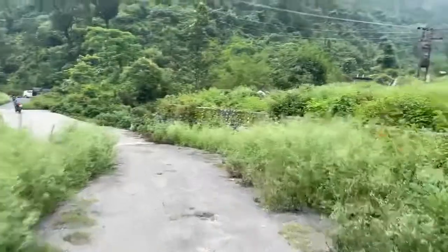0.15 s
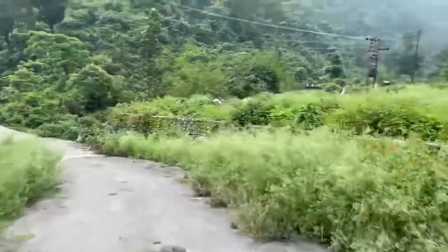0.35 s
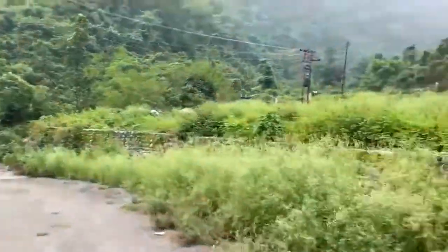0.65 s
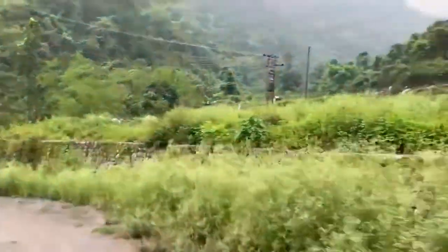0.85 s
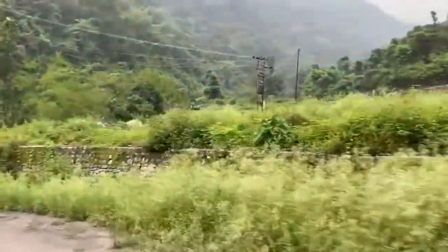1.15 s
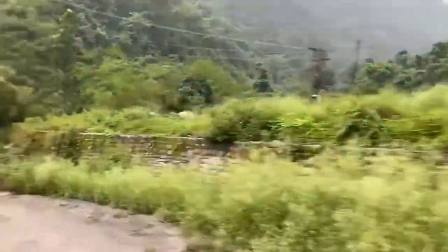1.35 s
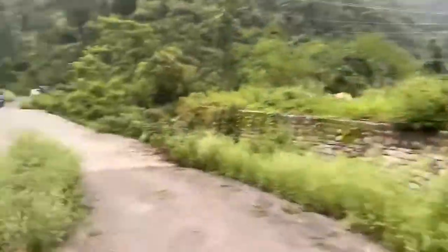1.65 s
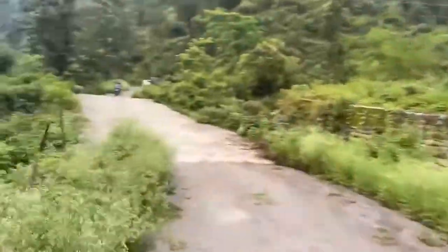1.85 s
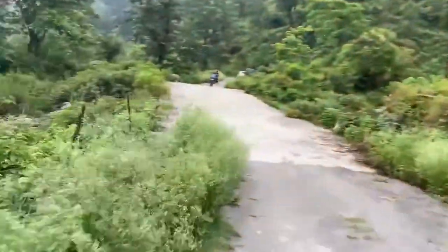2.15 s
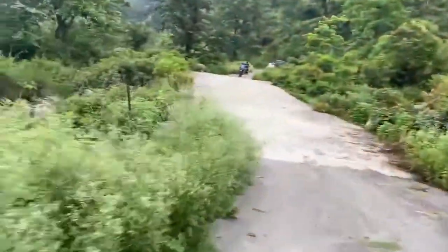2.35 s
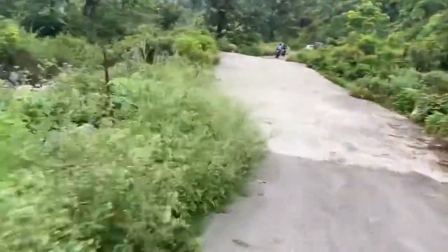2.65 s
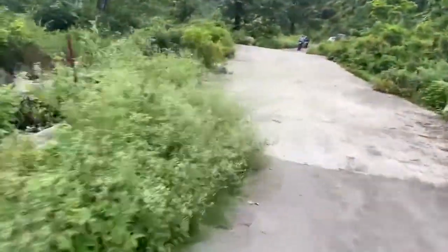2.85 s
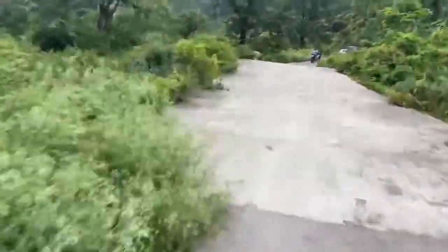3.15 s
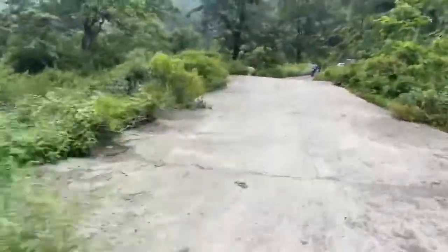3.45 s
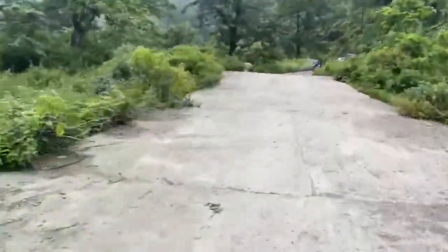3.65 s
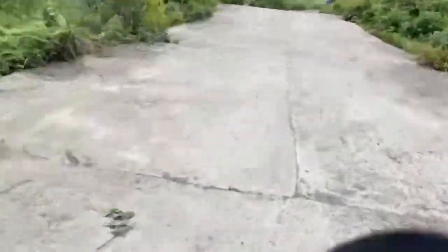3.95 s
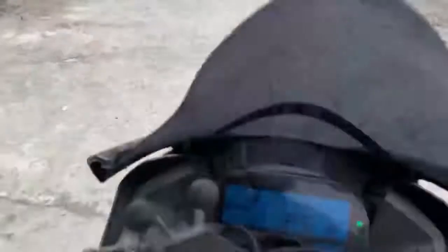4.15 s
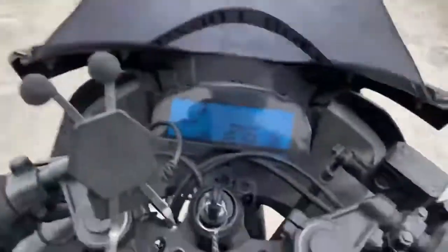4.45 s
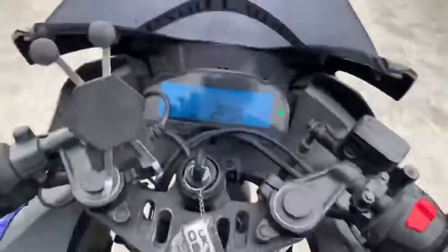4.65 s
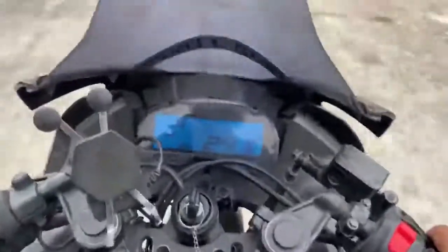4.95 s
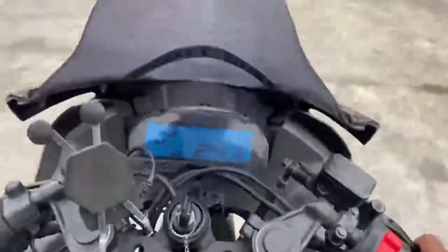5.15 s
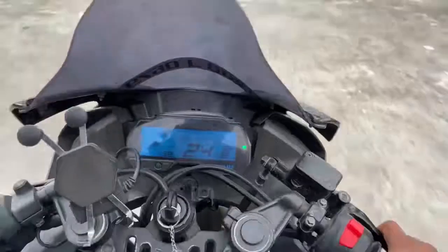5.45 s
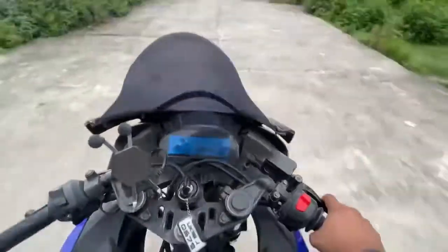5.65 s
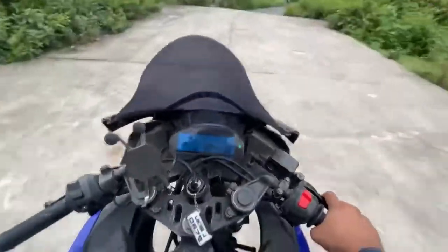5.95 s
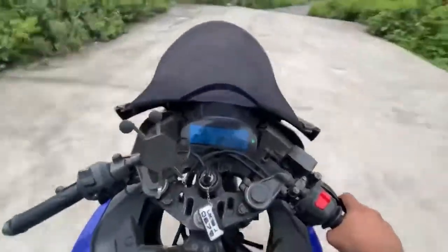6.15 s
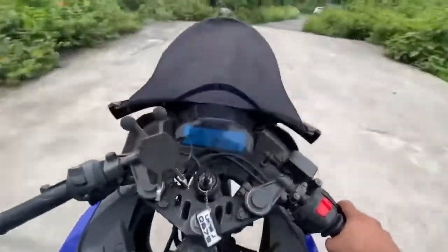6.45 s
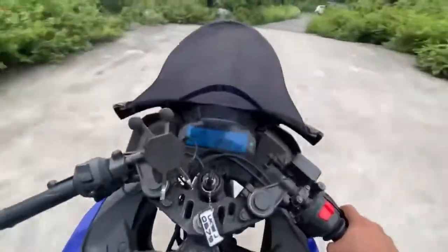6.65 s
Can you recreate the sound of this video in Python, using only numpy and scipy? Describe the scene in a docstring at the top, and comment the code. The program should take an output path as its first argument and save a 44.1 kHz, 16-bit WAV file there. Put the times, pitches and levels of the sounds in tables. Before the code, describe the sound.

Wind rumbles and thumps on a microphone carried on a small motorcycle along a rough track. Beneath it, throughout, a single-cylinder engine chugs at low, nearly even revs, with light valve clatter and a steady tyre roar. Strong gusts come in the first second. From about 0.3 to 1.2 seconds a brake gives a thin, high, stuttering squeal, loudest near 0.7. Faint crickets trill in short bursts until 2 seconds and again around 3.3. The wind eases between about 1.6 and 4 seconds, with a few softer swells. Then the roar grows slightly and the hardest buffets land around 4.3 to 4.5 seconds, along with a very brief whine from the bike. The engine's clatter becomes a little more ringing, and dull blows of air keep coming. From about 5.6 seconds the wind sounds wider and leans right as the bike runs on until nearly 7 seconds.

```python
"""Wind rumbles and thumps on the two microphone ports of a camera riding a small motorcycle down a rough
track through scrub. Under it the single cylinder turns at low revs: each firing rings the exhaust pipe,
the valve gear clatters and the tyres roar. Early on a brake disc squeals by stick-slip and crickets trill
faintly. Late on the camera tips down to the tank, the bike whines briefly, and the camera turns so that
the wind meets one port first."""
import sys
import numpy as np
from scipy import signal
from scipy.fft import next_fast_len
from scipy.io import wavfile
from scipy.ndimage import uniform_filter1d, minimum_filter1d

SR = 44100
rng = np.random.default_rng(int(sys.argv[2]) if len(sys.argv) > 2 else 0)


def dump(signal):
    """Clip the signal to [-1, 1] and save it as 16-bit WAV at the path in sys.argv[1]."""
    limited = np.clip(np.atleast_2d(signal).T, -1, 1)
    pcm = np.round(limited * 32767).astype(np.int16)
    wavfile.write(sys.argv[1], SR, pcm)


N = 299439

# wind bed: (time [s], rumble [dB], deep layer against the rumble [dB], flutter [dB])
WIND_LEVELS = [(0, -13.5, -27, -30), (.26, -20, -3, -29.5), (.38, -14.5, -2.5, -28),
               (.76, -15.5, -3.5, -23.5), (.84, -27, -5.5, -23), (1.44, -19.5, -4.5, -23),
               (1.6, -31.5, -6.5, -32.5), (2.05, -34.5, 1, -42), (2.3, -20.5, -18, -34),
               (2.52, -16.5, -18, -29.5), (2.7, -28, -4, -28.5), (3.0, -28.5, -8, -33.5),
               (3.15, -20.5, -16, -29.5), (3.28, -26.5, -9, -27.5), (3.42, -20, -17, -28),
               (3.6, -30, 2, -32.5), (3.9, -24.5, -12, -29.5), (4.1, -16.5, -5, -28), (4.3, -17.5, -7, -24),
               (4.39, -20, -7, -23), (4.49, -16, -6, -20.5), (4.54, -23, -5, -27.5), (4.6, -20, -0.5, -28),
               (4.73, -28.5, -4, -27.5), (5.1, -26.5, -6, -29.5), (5.55, -30.5, -5, -30.5),
               (5.65, -20, -8, -22), (5.8, -27, -5, -34), (6.03, -25.5, -2, -21.5), (6.2, -22, -5, -28),
               (6.79, -27, -6, -29)]
# single blows of air: (time [s], relative level [dB], crack accent [dB], crack pitch [Hz])
AIR_BLOWS = [(0.317, -7.5, -25, 498), (0.356, -11, -25, 450), (0.391, -4.5, -9, 510),
             (0.425, -14, -12, 500), (0.456, -11, -26, 450), (0.48, -29, -25, 750), (0.518, -10, -21, 485),
             (0.543, -11, -11, 434), (0.587, -7, -24, 514), (0.626, -11, -20, 398), (0.684, -4.5, -29, 774),
             (0.76, -0.5, -18, 482), (0.887, -5.5, -19, 570), (0.929, -11, -1.5, 467),
             (0.981, -11.5, -3.5, 517), (1.092, -8.5, -1, 630), (1.143, -26, 5, 647),
             (1.396, -17.5, 0, 784), (2.046, -18.5, -5, 925), (3.451, -13, -19, 560),
             (3.964, -11.5, -19, 727), (4.273, -5.5, -29, 549), (4.326, 1.5, -12, 486),
             (4.358, -1, 1.5, 530), (4.384, -12, -12, 400), (4.4, -12, -10, 400), (4.422, 3, -2, 510),
             (4.458, 1, -10, 550), (4.47, 1, -17, 450), (4.503, -4.5, -2.5, 475), (4.572, -10.5, -10, 454),
             (4.771, -6.5, -16, 471), (4.788, -3.5, -17, 770), (4.89, -3.5, -24, 506),
             (4.918, -1.5, -3.5, 650), (4.97, -1, -9, 557), (5.019, -11, -3.5, 490), (5.056, -11, -16, 420),
             (5.088, -2, -7.5, 550), (5.134, -19, -15, 420), (5.248, -7, -17, 464), (5.325, -6, -13, 540),
             (5.341, -21, -19, 500), (5.46, -4, -3, 620), (5.487, -10.5, -9, 780), (5.648, -21, 2.5, 490),
             (5.744, -14, -29, 759), (5.898, -8.5, -6, 710), (5.97, -11, -21, 1130),
             (6.051, -16.5, 2, 1150), (6.079, -13.5, -12, 776), (6.137, -22, 3, 576),
             (6.531, -15.5, -9.5, 482), (6.749, -17.5, -10, 870)]
# camera pose: (time [s], tipped to the tank [0-1], turned [0-1], wind's lead at the left port [rad])
CAMERA_POSE = [(0, 0.83, 0, 0.41), (1.5, 0.43, 0, 0.93), (3.6, 0.1, 0, 0.98), (4.3, 1, 0, -0.73),
               (5.5, 1, 0, -0.82), (5.7, 1, 0.9, -0.06), (6.2, 0.96, 1, 0.063), (6.79, 1, 1, 0.084)]
# engine speed: (time [s], firing rate [Hz])
FIRING_RATE = [(0, 20.854), (.45, 22.289), (1.05, 19.664), (1.9, 20.34), (2.4, 21.51), (3.3, 22.527),
               (3.95, 24.148), (4.6, 22.752), (5.6, 22.681), (6.45, 21.677), (6.79, 22.016)]
# exhaust pipe resonances: (pitch [Hz], width [Hz], relative level [dB])
PIPE_MODES = [(70, 34, 19), (110, 42.4, 27.5), (159, 120, 11)]
# valve gear and casing rings: (place in the cycle [0-1], pitch [Hz], width [Hz], decay [ms],
# steady rattle [0-1], level [dB], gain when tipped [dB], left-right likeness [0-1])
CLATTER_MODES = [(.93, 4700, 420, 6, .1, -51, -5.5, .5), (.65, 4900, 700, 8, .3, -56, 0, .5),
                 (.96, 3780, 300, 6, .12, -52.5, -5.5, .4), (.95, 3370, 130, 6, .15, -53.5, -2.5, .2),
                 (.62, 3250, 220, 8, .6, -56, 3, .4), (.7, 2500, 1600, 5, .05, -52, -1, .4),
                 (.4, 752, 33, 10, .6, -46.5, 8.5, .8), (.6, 955, 90, 8, .5, -46, 3, .7),
                 (.65, 1110, 120, 6, .4, -46, 4.5, .7), (.65, 1440, 60, 6, .3, -54, 5, .7),
                 (.68, 1615, 60, 6, .3, -48.5, 2.5, .8), (.68, 1750, 36, 7, 1, -59, 12, .7),
                 (.68, 1870, 70, 6, .5, -53, 4.5, .6), (.68, 2080, 60, 6, .3, -54, 2, .4),
                 (.68, 2190, 60, 6, .5, -56.5, 3, .5), (.68, 2350, 80, 6, .3, -53.5, -3, .4),
                 (.68, 2280, 50, 6, .7, -66, 16, .4), (.68, 2510, 90, 6, .3, -53.5, 0, .3),
                 (.68, 2590, 55, 5, .6, -64, 13, .4), (.68, 2910, 130, 6, .5, -59, 7.5, .3),
                 (.68, 2715, 50, 5, .2, -54, -7, .2), (.95, 4090, 70, 6, .4, -60, 1, .5),
                 (.67, 5700, 800, 6, .3, -60, 2, .1)]
# the bike's brief whine: (pitch [Hz], width [Hz], level [dB])
WHINE_MODES = [(2290, 40, -40), (1660, 45, -41)]
# tyre and engine roar: (time [s], relative level [dB], relative treble [dB])
ROAR_LEVELS = [(0, -34, -22), (.25, -38, -14.5), (1.25, -35.5, -19.5), (3.69, -35, -16),
               (4.12, -31.5, -16.5), (4.33, -33.5, -14.5), (5.35, -33, -15.5), (5.86, -34, -16.5),
               (6.79, -33, -17)]
# tone of the roar: (frequency [Hz], relative level [dB])
ROAR_SPECTRUM = [(150, 4), (400, -1.5), (900, 1.5), (1400, -2.5), (2050, -9), (3000, -14), (4300, -17.5),
                 (6500, -19.5), (7300, -26), (8800, -24.5), (11000, -25), (13000, -30), (15800, -25)]
# the roar's hiss is wide in some treble bands, centred in others:
# (frequency [Hz], left-right likeness [-1..1])
ROAR_LIKENESS = [(300, .7), (1500, .65), (2400, .1), (3800, .55), (5000, .3), (6300, -.2), (6900, -.6),
                 (7300, -.995), (8800, -.995), (9200, -.4), (10100, .3), (10500, .995), (12300, .995),
                 (12800, 0), (13500, -.5), (13900, -.995)]
# swell of the brake squeal: (time [s], level [dB])
SQUEAL_LEVELS = [(0.2, -67), (.33, -55), (.38, -39.5), (.41, -39), (0.46, -33), (.55, -40.5), (0.6, -41),
                 (0.676, -26.5), (0.74, -29), (.84, -33.5), (.89, -41), (.93, -43), (1.0, -46), (1.1, -43),
                 (1.2, -68)]
# squeal side tones: (pitch [ratio], relative level [dB], swell followed [ratio], right gain [ratio])
SQUEAL_PARTIALS = [(1.03, -8.5, .45, .8), (.97, -20, 1, .8), (.845, -19, 1.1, .3), (2, -20, 1, -.98)]
# cricket trills: (time [s], length [s], pitch [Hz], level [dB], right gain [ratio])
TRILLS = [(0.033, .06, 5800, -53, -.4), (0.118, .1, 5800, -47, -.4), (0.245, 0.055, 5900, -52, .8),
          (0.333, 0.11, 5800, -50, 0.87), (0.402, 0.15, 5600, -46, -.4), (0.558, 0.15, 5840, -49, -0.27),
          (.72, 0.11, 5850, -46, -.4), (0.848, .07, 5800, -49, .8), (0.974, 0.091, 5800, -47, -.2),
          (1.263, .12, 5900, -48, -.3), (1.566, .17, 5850, -64, -0.32), (1.87, 0.12, 5800, -49, -0.59),
          (3.202, 0.098, 6300, -47, -.2), (3.323, 0.11, 6100, -47, -0.36)]

TIME = np.arange(N) / SR
BIKE_PAN_DB_PER_S, BIKE_PAN_LIMIT_DB = -1.1, -2.8  # left minus right: the bike drifts to the right


def amp(db):
    """Decibels to gain."""
    return 10 ** (np.asarray(db) / 20)


def unit_rms(x):
    """Scales to rms 1."""
    return x / np.sqrt(np.mean(x ** 2) + 1e-20)


def curves(rows, t):
    """Every column of a table read at times t."""
    times, *columns = np.transpose(rows)
    return [np.interp(t, times, column) for column in columns]


def add(mix, start_s, sound):
    """Lays a stereo sound into the mix."""
    start = max(round(start_s * SR), 0)
    part = mix[:, start:start + sound.shape[1]]
    part += sound[:, :part.shape[1]]


def resonate(x, hz, width, stages=2):
    """Resonances in series, each of gain about 1 at hz."""
    r = np.exp(-np.pi * width / SR)
    c = r * np.cos(2 * np.pi * hz / SR)
    for _ in range(stages):
        x = signal.lfilter([2 * (1 - r), -2 * (1 - r) * c], [1, -2 * c, r ** 2], x)
    return x


def stereo(mid, side, likeness, pan_db):
    """Left and right share mid and differ by side."""
    angle = np.arccos(np.clip(likeness, -1, 1)) / 2
    shared, apart = np.cos(angle) * mid, np.sin(angle) * side
    return np.array([(shared + apart) * amp(pan_db / 2), (shared - apart) * amp(-pan_db / 2)])


def wander(per_s):
    """Smooth random drift of rms 1."""
    size = max(int(SR / 16 / per_s), 1)
    slow = rng.standard_normal(N // 16 + 2)
    for _ in range(2):
        slow = uniform_filter1d(slow, size, mode="wrap")
    return np.interp(np.arange(N) / 16, np.arange(len(slow)), unit_rms(slow))


def eddies(lo_hz, hi_hz, per_s, spread_db, cycles, tilt, lumps, bands):
    """Two unrelated streams of short pressure swirls of many sizes."""
    out = np.zeros((2, N))
    for hz in np.geomspace(lo_hz, hi_hz, bands):
        turns = np.arange(-2 * cycles, 2 * cycles, hz / SR)
        swirl = np.exp(-2 * (turns / cycles) ** 2) * np.sin(2 * np.pi * (turns + rng.random()))
        when = rng.integers(0, 2 * N, int(2 * N * per_s / bands / SR))
        strength = amp(spread_db * np.minimum(rng.exponential(1, len(when)), 4))
        kicks = np.zeros((2, N))
        kicks.flat[when] = strength * rng.choice([-1, 1], len(when))
        out += signal.oaconvolve(kicks * lumps, swirl[None] * (hz / lo_hz) ** tilt, "same", axes=1)
    return unit_rms(out)


def wind():
    """Swirls on the ports: a deep layer under rumble and flutter that share the same small gusts."""
    rumble_db, deep_db, flutter_db = curves(WIND_LEVELS, TIME)
    turned = curves(CAMERA_POSE, TIME)[1]
    likeness = .9 * (1 - turned) - .35 * turned
    pan_db = -.5 - 4.5 * turned + 2.2 * wander(12)
    coarse_t, lag_s, half_width_s = TIME[::44], .016, .016
    swells = sum(amp(db) * np.exp(-((coarse_t - s - lag_s) / half_width_s) ** 2)
                 for s, db, _, _ in AIR_BLOWS)  # each buffet briefly swells the bed
    swells = np.interp(TIME, coarse_t, swells)
    lumps = amp(1.7 * wander(68) + 1.37 * wander(19.6))
    deep = eddies(55.4, 58, per_s=120, spread_db=1, cycles=1.1, tilt=.12, lumps=1, bands=4)
    rumble = eddies(84.5, 169.7, per_s=300, spread_db=1.6, cycles=1.7, tilt=-.39, lumps=lumps, bands=7)
    flutter = eddies(241.5, 700, per_s=800, spread_db=2.1, cycles=1.18, tilt=-.69, lumps=lumps, bands=8)
    low = (amp(rumble_db) + amp(-17.5) * swells) * (rumble + amp(deep_db) * deep)
    high = (amp(flutter_db) + amp(-34.5) * swells) * flutter
    # small swirls differ more between the ports than large ones
    return stereo(*low, likeness, pan_db) + stereo(*high, likeness - .15, pan_db)


def buffets():
    """Each dull blow of air opens with a short crack, then slides raggedly down into the bass."""
    out = np.zeros((2, N))
    t = np.arange(4000) / SR
    age = t / .0291  # in lengths of a blow
    envelope = np.sin(np.pi / 2 * np.minimum(age / .17, 1)) ** 2 * np.exp(-(age / .74) ** 2)
    crack_t = t - .008
    crack_envelope = np.exp(-(crack_t / .0045) ** 2)
    for s, db, crack_db, crack_hz in AIR_BLOWS:
        turned = curves(CAMERA_POSE, s)[1]
        pan_db = -1.5 - 6 * turned + 3.5 * rng.standard_normal()
        phase, noise = rng.random(3), rng.standard_normal((3, len(t)))
        ragged = 1 + .28 * unit_rms(uniform_filter1d(noise[0], 150))
        pitch_hz = (91 + 371.4 * np.exp(-age / .363)) * ragged
        slide = np.sin(2 * np.pi * (np.cumsum(pitch_hz) / SR + phase[0]))
        puff_mid, puff_side = map(unit_rms, resonate(resonate(noise[1:], 293, 480), 266, 430, stages=1))
        grit_db = 3.5 * unit_rms(uniform_filter1d(uniform_filter1d(noise[1:], 30), 30))
        falling = np.sin(2 * np.pi * (crack_hz * crack_t * (1 - 35 * crack_t) + phase[1:, None]))
        crack_mid, crack_side = amp(crack_db + 4.5 + grit_db) * crack_envelope * falling
        mid = envelope * (slide + .42 * puff_mid) + crack_mid
        side = .51 * envelope * puff_side + .78 * crack_side
        add(out, s - .002, amp(db - 6) * stereo(mid, side, .44, pan_db))
    return signal.sosfilt(signal.butter(4, 2200, fs=SR, output="sos"), out)


def sweep_past_ports(air):
    """The swirls pass one port a part of a cycle before the other."""
    lead = curves(CAMERA_POSE, TIME)[2] * np.array([[.5], [-.5]])
    return (signal.hilbert(air, next_fast_len(N))[:, :N] * np.exp(1j * lead)).real


def exhaust(cycles, place=.64, spread_db=3, level_db=-31):
    """One uneven firing a cycle thumps the pipe's resonances."""
    count = np.floor(cycles - place + 1).astype(int)
    firings = np.diff(count, prepend=count[0]) * amp(spread_db * rng.standard_normal(300))[count]
    thump = sum(amp(db) * unit_rms(resonate(firings, hz, width)) for hz, width, db in PIPE_MODES)
    return amp(level_db) * unit_rms(thump)


def clatter(cycles, rate, rattle, pan_db):
    """Blows at set places in the cycle ring the valve gear and casings, swelling with the roar."""
    roar_db = curves(ROAR_LEVELS, TIME)[0]
    tipped = curves(CAMERA_POSE, TIME)[0]
    loose = cycles + .012 * wander(12)  # play in the parts shifts the blows a little
    out = np.zeros((2, N))
    for place, hz, width, decay_ms, steady, db, tipped_db, likeness in CLATTER_MODES:
        since_s = ((loose - place) % 1) / rate
        count = (loose - place + 1).astype(int)
        force = amp(2 * rng.standard_normal(300))[count]
        envelope = steady + force * np.exp(-since_s * 1000 / decay_ms)
        impacts = 9 * force * np.diff(count, prepend=count[0])
        drive = resonate(envelope * rattle + impacts, hz, 2 * width, stages=1)
        mid, side = map(unit_rms, resonate(drive, hz, width, stages=1))
        sway_db = 1.5 * wander(5)  # each ring comes and goes as the camera sways
        out += amp(db + tipped_db * tipped + sway_db) * stereo(mid, side, likeness, pan_db)
    return out * amp(roar_db - roar_db.mean())


def whine(rattle, pan_db, start_s=4.39, rise_s=.03):
    """Two narrow bands of noise sing out briefly from the bike."""
    tones = sum(amp(db) * unit_rms(resonate(rattle, hz, width)) for hz, width, db in WHINE_MODES)
    age = TIME - start_s
    envelope = np.clip(age / rise_s, 0, 1) * amp(-130 * age ** 2)
    return envelope * stereo(*tones, .49, pan_db)


def engine():
    """The crank times the thump and clatter, the whine joins them, and the treble above 7 kHz is cut."""
    rate = curves(FIRING_RATE, TIME)[0]
    cycles = .899 + np.cumsum(rate) / SR
    pan_db = np.maximum(BIKE_PAN_DB_PER_S * TIME, BIKE_PAN_LIMIT_DB)
    thump = exhaust(cycles)
    rattle = rng.standard_normal((2, N))
    out = thump + clatter(cycles, rate, rattle, pan_db) + whine(rattle, pan_db)
    return signal.sosfilt(signal.butter(6, 7000, fs=SR, output="sos"), out)


def roar():
    """Tyre and engine noise in drifting patches; the ports agree less when the camera is turned."""
    t, hz = np.arange(N // 128 + 5) * 128 / SR, np.fft.rfftfreq(512, 1 / SR)[:, None]

    def over_frequency(rows):
        """A table read along a log frequency axis."""
        points_hz, values = np.transpose(rows)
        return np.interp(np.log(hz + 1), np.log(points_hz), values)

    mid_re, mid_im, side_re, side_im, patches = rng.standard_normal((len(t), len(hz), 5)).T
    patches_db = 1.8 * unit_rms(uniform_filter1d(uniform_filter1d(patches, 6, 0), 20, 1))
    level_db, treble_db = curves(ROAR_LEVELS, t)
    turned = curves(CAMERA_POSE, t)[1]
    below_top = 1 - np.clip((hz - 8800) / 1500, 0, 1)  # the highest treble holds its stereo image
    pan_db = np.maximum(BIKE_PAN_DB_PER_S * t, BIKE_PAN_LIMIT_DB) * below_top
    likeness = over_frequency(ROAR_LIKENESS) * (1 - below_top * turned)
    tone_db = over_frequency(ROAR_SPECTRUM) + (treble_db - treble_db.mean()) * np.clip(hz / 9000, 0, 1)
    spectrum = stereo(mid_re + 1j * mid_im, side_re + 1j * side_im, likeness, pan_db)
    spectrum *= amp(tone_db + level_db - level_db.mean() + patches_db) * (hz > 100)
    noise = signal.istft(spectrum, nperseg=512, noverlap=384)[1][:, :N]
    return amp(level_db.mean() + 3) * unit_rms(noise)


def brake(pitch_hz=4246, right_lag_rad=.61, pan_db=-.5):
    """Stick-slip sings a disc mode, with fuzz and ragged side tones around it; the grip stutters."""
    level_db = curves(SQUEAL_LEVELS, TIME)[0]
    start_s, end_s = SQUEAL_LEVELS[0][0], SQUEAL_LEVELS[-1][0]
    gate = np.clip((TIME - start_s) / .05, 0, 1) * np.clip((end_s - TIME) / .04, 0, 1)
    phase = 2 * np.pi * np.cumsum(pitch_hz + 8 * wander(60)) / SR
    stutter_db = np.clip(-1.2 - level_db / 10, 1.4, 3.2) * wander(90)  # the fainter, the less steady
    out = np.sqrt(2) * amp(stutter_db) * np.sin([phase, phase - right_lag_rad])
    fuzz = unit_rms(resonate(rng.standard_normal((2, N)), pitch_hz, 130))
    out += amp(-5 - .2 * (level_db + 35)) * fuzz
    for ratio, db, follows, right in SQUEAL_PARTIALS:
        tone = np.sin(ratio * phase + 1.5 * wander(60))
        gain = amp(db + (follows - 1) * (level_db + 40) + 3 * wander(30))
        out += gain * tone * np.array([[1], [right]])
    return out * gate * amp(level_db + pan_db * np.array([[.5], [-.5]]))


def crickets(clicks_per_s=95):
    """Fast clicks ring a narrow wing resonance, off to the side."""
    out = np.zeros((2, N))
    for s, length, hz, db, right in TRILLS:
        t = np.arange(int(length * SR)) / SR
        clicks = np.cos(np.pi * clicks_per_s * t) ** 4 * rng.standard_normal(len(t))
        trill = unit_rms(resonate(clicks, hz, 600)) * np.hanning(len(t)) ** .5
        add(out, s, amp(db) * trill * np.array([[1], [right]]))
    return out


def scene():
    """All sources at the two ports."""
    return engine() + roar() + sweep_past_ports(wind() + buffets()) + brake() + crickets()


def record(dry, low_cut_hz=42, ceiling=.92, high_cut_hz=15800):
    """The microphone drops the deepest bass, a quick limiter holds the peaks, and the very top is cut."""
    thinned = signal.sosfilt(signal.butter(2, low_cut_hz, "high", fs=SR, output="sos"), dry)
    gain = np.minimum(ceiling / (abs(thinned).max(0) + 1e-9), 1)
    gain = minimum_filter1d(gain, 441)  # lowest within 5 ms either way
    limited = thinned * uniform_filter1d(uniform_filter1d(gain, 220), 220)
    high_cut = signal.firwin(511, high_cut_hz, window=("kaiser", 9), fs=SR)
    return signal.oaconvolve(limited, high_cut[None], "same")


dry = scene()
out = record(dry)
dump(out)
```